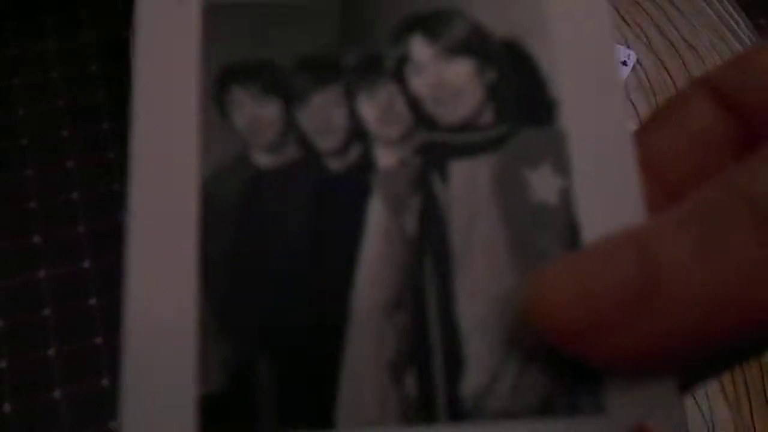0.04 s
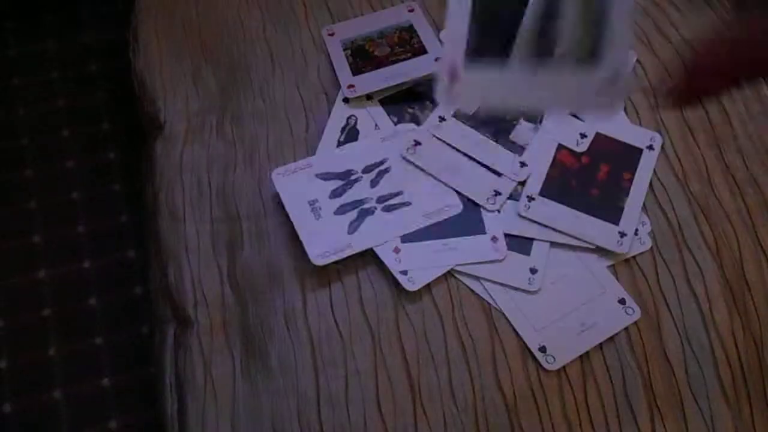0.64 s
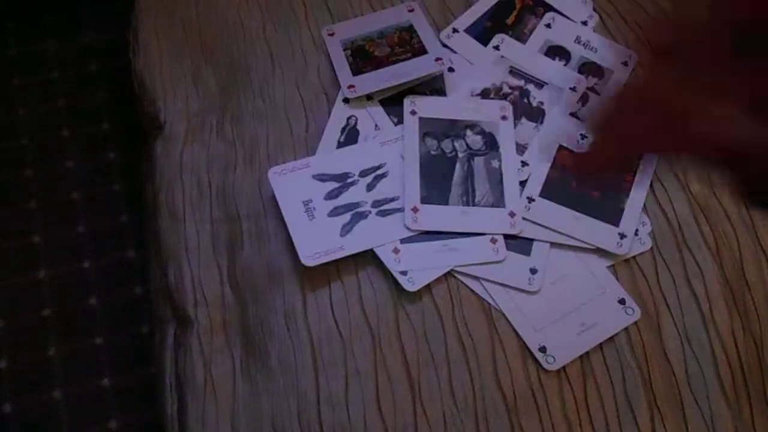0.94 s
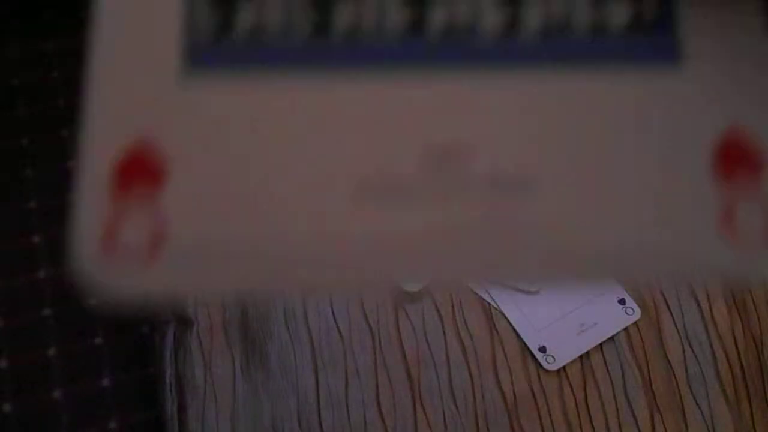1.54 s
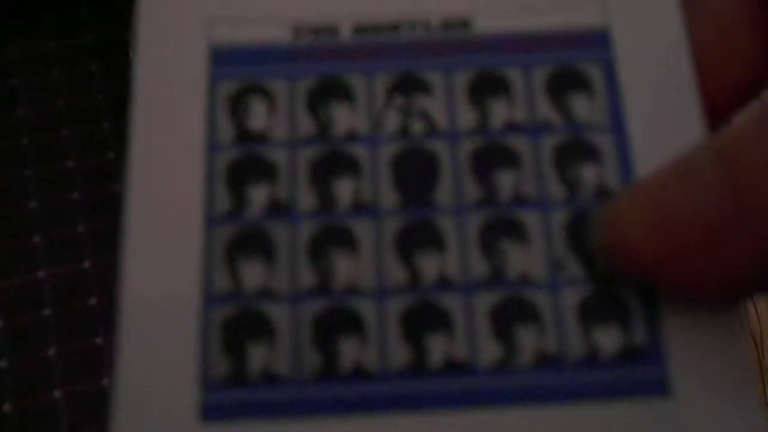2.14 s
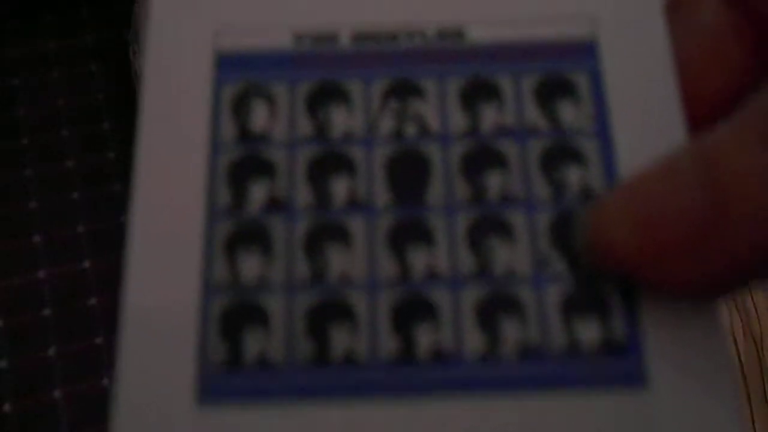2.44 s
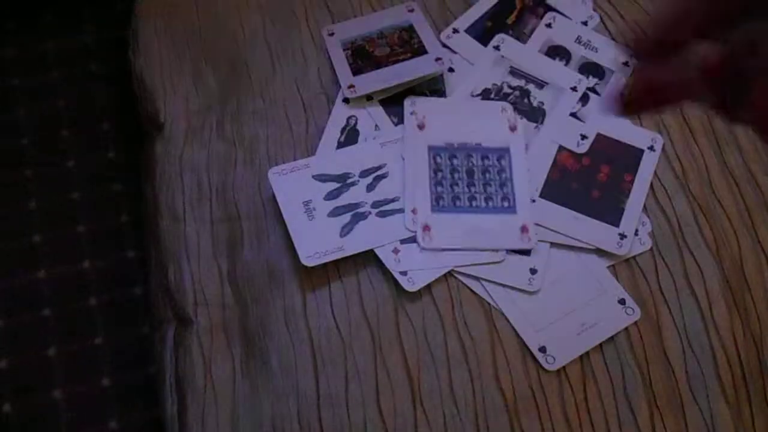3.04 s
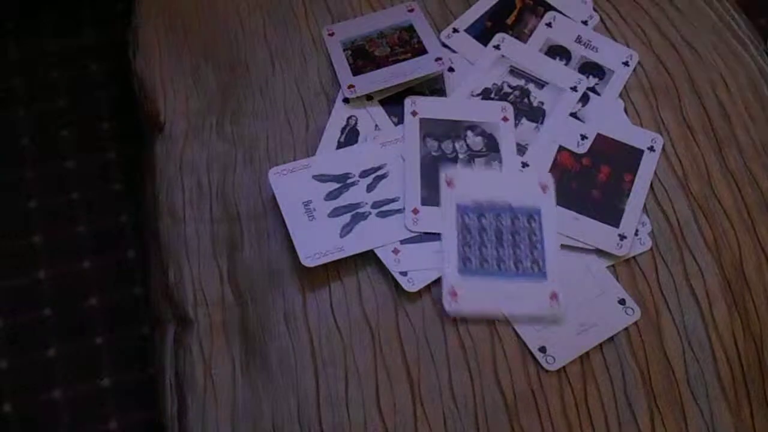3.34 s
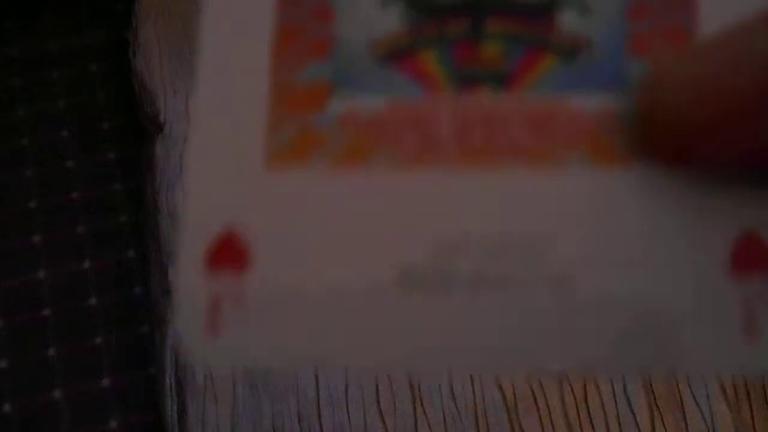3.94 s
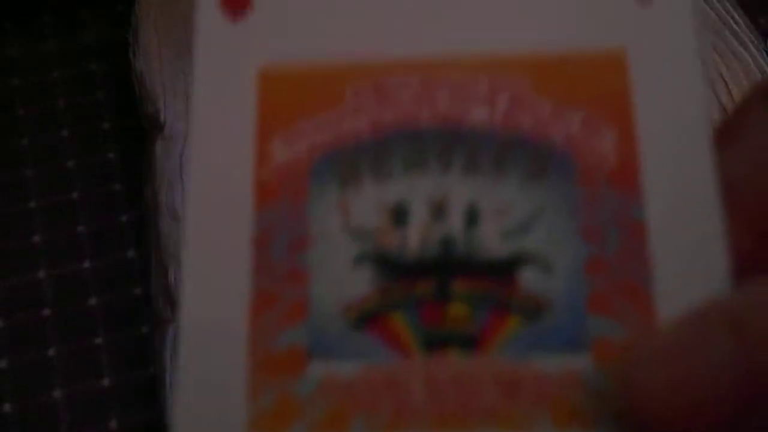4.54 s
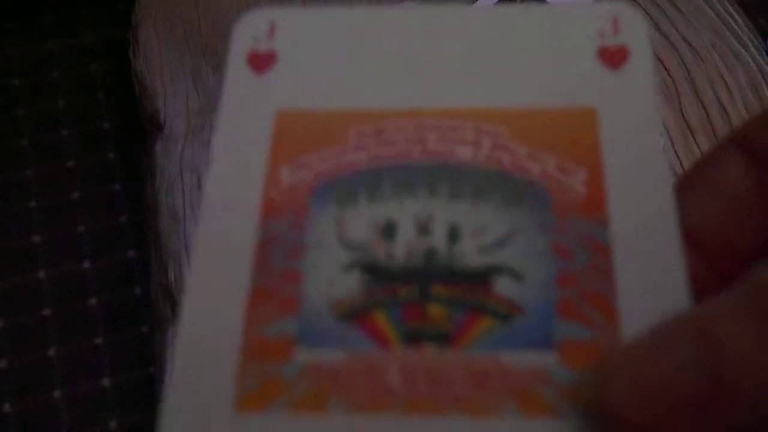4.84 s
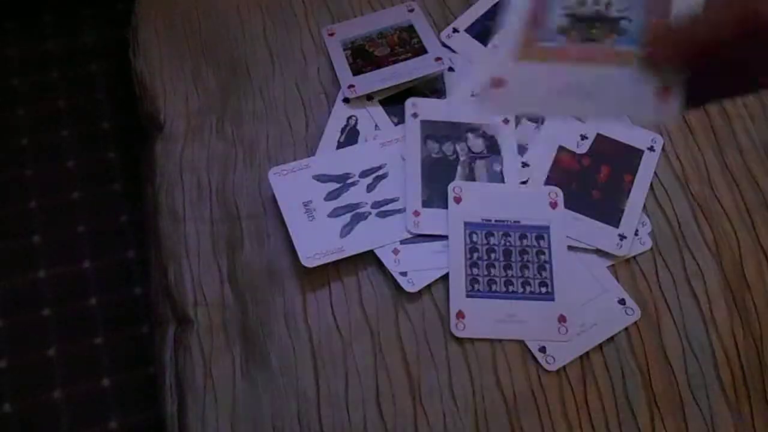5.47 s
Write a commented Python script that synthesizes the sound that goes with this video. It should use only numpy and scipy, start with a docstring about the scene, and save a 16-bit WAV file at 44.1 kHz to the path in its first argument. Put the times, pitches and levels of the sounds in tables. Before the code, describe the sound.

Playing cards are tossed onto a loose pile on a wooden table, heard close up in a small room with a very short echo. A quiet fan and a low electrical hum run throughout. After a barely audible swish, the first card lands at about 0.8 seconds in a quick clatter of crisp clicks. Soft, hissy strokes of card sliding over card follow, ending in a small tick and scrape near 1.4 seconds. After a lull and another faint swish, the second card hits at about 3 seconds with a louder, sharp slap and a few faint settling ticks. There is a brief scrape at 3.3 seconds, then light rubbing until about 3.9. Only the fan and hum remain until a faint swish at 5.4 seconds, and the third card ticks on its edge and slaps flat, loud and sharp, at about 5.7 seconds.

```python
"""Playing cards tossed one at a time onto a loose pile on a wooden table, close to the microphone.
Each card swishes through the air, ticks on its edge, flexes, slaps flat and settles; between tosses
the thumb slides the next one off the deck in a few strokes. The small room answers briefly,
and a fan and a mains hum run quietly in the background."""
import sys
import numpy as np
from scipy import signal
from scipy.fft import rfft, irfft
from scipy.io import wavfile
from scipy.ndimage import uniform_filter1d

SR = 44100
rng = np.random.default_rng(int(sys.argv[2]) if len(sys.argv) > 2 else 0)


def digitize_waveform(pressure):
    """Quantize a signal to 16-bit integers and store it at the path in sys.argv[1].

    Rows of a 2-D input are taken as channels; values are limited to [-1, 1].
    """
    field = np.atleast_2d(pressure).T
    bounded = np.clip(field, -1, 1)
    quanta = np.round(bounded * 32767).astype(np.int16)
    wavfile.write(sys.argv[1], SR, quanta)


N = 251728
TIME = np.arange(N) / SR

# broad colour of paper friction: (frequency [Hz], level [dB])
FRICTION_COLOUR = [(150, -30), (700, -9.5), (1800, -7), (2600, -0.5), (3600, 2), (5500, 3), (7500, 2.5),
                   (10000, 0), (12000, -8.5)]
# resonances of a moving card: (centre [Hz], width [Hz], lift [dB])
FRICTION_MODES = [(3800, 720, 0), (6240, 2100, 2)]


def undb(db):
    """Decibels to gain."""
    return 10 ** (np.asarray(db) / 20)


def unit(x):
    """Scale to rms 1."""
    return x / np.sqrt(np.mean(x ** 2))


def add(track, s, sound):
    """Mix a sound into the track at time s."""
    start = int(s * SR)
    part = sound[:max(len(track) - start, 0)]
    track[start:start + len(part)] += part


def fade(t, t60):
    """Exponential decay, 60 dB down after t60."""
    return np.exp(-np.log(1000) * t / t60)


def response(colour, modes=(), tilt_db=0, size=8192):
    """Impulse response of unit energy: a broad colour, lifted at its modes, tilted per octave above 1 kHz."""
    hz = np.maximum(np.arange(size // 2 + 1) * SR / size, 1)
    knots, levels = np.transpose(colour)
    db = np.interp(np.log(hz), np.log(knots), levels) + tilt_db * np.log2(np.maximum(hz, 1000))
    for centre, width, lift in modes:
        db = db + lift / (1 + (2 * (hz - centre) / width) ** 2)
    cepstrum = irfft(np.log(undb(db)))[:size // 2]  # one-sided, for minimum phase
    cepstrum[0] = 0
    impulse = irfft(np.exp(rfft(2 * cepstrum, size)))[:size // 2]
    return impulse / np.sqrt(np.sum(impulse ** 2))


def through(x, impulse):
    """Pass a sound through an impulse response."""
    return signal.fftconvolve(x, impulse)[:len(x)]


def walk(rate_hz):
    """Smooth random wander with a spread near 1."""
    steps = rng.standard_normal(int(N / SR * rate_hz) + 2)
    return np.interp(TIME * rate_hz, np.arange(len(steps)), steps)


def scatter(envelope, smooth_hz, crack=0):
    """Dense random echoes under an envelope, after an optional crack; even in colour, of unit energy."""
    size = len(envelope)
    echoes = rng.standard_normal(size) * envelope
    echoes[0] += crack
    spectrum = rfft(echoes, 2 * size)
    power = uniform_filter1d(np.abs(spectrum) ** 2, int(2 * size * smooth_hz / SR) + 1)
    echoes = irfft(spectrum / np.sqrt(power))[:size]
    return echoes / np.sqrt(np.sum(echoes ** 2))


def mains_hum(hz=99.8, level_db=-60.5):
    """A steady background tone at twice the mains frequency."""
    return np.sqrt(2) * np.sin(2 * np.pi * hz * TIME) * undb(level_db)


def fan(gain_db=1.5, waver_db=0.5, whine_hz=1803, wander_hz=6, whine_db=-77):
    """Wavering air noise coloured by the housing, and a faint whine that wanders with the fan's speed."""
    # broad colour of the moving air: (frequency [Hz], level [dB])
    air_colour = [(25, 6), (60, 12), (90, 0.5), (135, 4), (220, -2), (600, 1.5), (900, -1), (1600, -1),
                  (2100, -1), (3000, -0.5), (4400, -6), (7000, -4), (10000, -11), (12000, -17.5)]
    # resonances of the housing: (centre [Hz], width [Hz], lift [dB])
    housing_modes = [(334.8, 18, 7), (545.3, 23, 11), (1116, 41, 11.5), (1358, 30, 10.5), (1621, 240, 6),
                     (1819, 110, 9), (2686, 230, 7), (3280, 88, 8), (3900, 59, 8.5), (6650, 74, 5),
                     (6990, 110, 9), (9680, 180, 7)]
    # slow fall of the air noise: (time [s], level before gain_db [dB])
    air_levels = [(0.0, -55), (0.3, -57.5), (3.2, -58), (4.3, -59.5)]
    s, db = np.transpose(air_levels)
    air = unit(through(rng.standard_normal(N), response(air_colour, housing_modes)))
    air *= undb(np.interp(TIME, s, db) + gain_db + waver_db * walk(rate_hz=6))
    cycles = np.cumsum(whine_hz + wander_hz * walk(rate_hz=7.3)) / SR
    return air + undb(whine_db) * np.sqrt(2) * np.sin(2 * np.pi * cycles)


def room(x, build_s=0.0027, early_t60_s=0.061, early_db=-20, late_t60_s=0.17, late_db=-14.5):
    """Table and hand throw back quick echoes; the walls of the small room add a soft diffuse tail."""
    # warm colour of the echoes: (frequency [Hz], level [dB])
    echo_colour = [(200, 6.3), (2000, 4.5), (5000, 1.8), (10000, -0.5)]
    t = np.arange(SR // 2) / SR
    build = 1 - np.exp(-t / build_s)
    early = undb(early_db) * scatter(build * fade(t, early_t60_s), smooth_hz=227)
    late = undb(late_db) * scatter(build * fade(t, late_t60_s), smooth_hz=60)
    return through(x, through(early + late, response(echo_colour)))


def paper_grains(grain_db=3, catch_db=1.9, catch_hz=220):
    """Paper fibres catch and slip in tiny grains of noise."""
    noise = rng.standard_normal(N)
    roughness_db = grain_db * rng.standard_normal(N) + catch_db * walk(catch_hz)
    return unit(noise * undb(roughness_db))


def stroke(peak_s, rise_s, fall_s, speed_exponent=1.36):
    """Loudness of one hand movement, 0 to 1: it grows with speed, from rest to fastest and back."""
    ramp = np.interp(TIME, [peak_s - rise_s, peak_s, peak_s + fall_s], [0, 1, 0])
    speed = np.sin(np.pi / 2 * ramp)
    return speed ** speed_exponent


def swishes(grains, half_swing_s=0.1, tilt_db=-3.6):
    """A card swung through the air before it is let go gives a dull swish."""
    # swings of the hand: (fastest moment [s], level [dB])
    swings = [(0.56, -60), (2.65, -58), (5.395, -56)]
    swish = through(grains, response(FRICTION_COLOUR, FRICTION_MODES, tilt_db))
    return swish * sum(undb(db) * stroke(s, half_swing_s, half_swing_s) for s, db in swings)


def slides(grains, ring_width_hz=1800, ring_lift_db=4.5):
    """A card slid over other cards hisses, and sings at a pitch set by where it is held."""
    # strokes of card over card:
    # (fastest moment [s], level [dB], speeding up [s], slowing down [s], tilt [dB/octave], ring [Hz])
    strokes = [ (0.93, -54.5, 0.02, 0.19, -3.5, 5000), (1.055, -48.5, 0.035, 0.057, 0.5, 6500),
               (1.211, -50, 0.14, 0.024, 0, 5200), (1.362, -47, 0.085, 0.04, -0.5, 4750),
               (1.39, -38.5, 0.02, 0.012, 0, 3770), (3.297, -38.5, 0.018, 0.055, 1, 6500),
               (3.47, -57.5, 0.15, 0.11, -0.5, 5500), (3.585, -52, 0.058, 0.056, -2, 4900),
               (3.64, -55, 0.047, 0.085, 2.5, 9300), (3.676, -46.5, 0.019, 0.013, -3.5, 5560),
               (3.85, -64, 0.18, 0.098, 1, 9300)]
    out = np.zeros(N)
    for s, db, rise_s, fall_s, tilt_db, ring_hz in strokes:
        ring = (ring_hz, ring_width_hz, ring_lift_db)
        hiss = through(grains, response(FRICTION_COLOUR, FRICTION_MODES + [ring], tilt_db))
        out += undb(db) * stroke(s, rise_s, fall_s) * hiss
    return out


def puffs(rise_s=0.0001, size=256):
    """A card landing flat squeezes out one pulse of air, which gives the slap its low end."""
    # flat landings: (time [s], peak [dB])
    flat_landings = [(0.837, -43), (2.9841, -21), (5.6971, -14.5)]
    out = np.zeros(N)
    age = np.arange(size) / SR / rise_s
    for s, db in flat_landings:
        add(out, s, -undb(db) * age * np.exp(1 - age))
    return out


def flexes(hz=1303, rise_s=0.0025, steepness=3, size=1024):
    """A card landing on its edge bends and sings for a few cycles, dying as the pile damps it."""
    # edge landings: (time [s], peak [dB])
    edge_landings = [(0.8053, -19.5), (2.9558, -34), (5.6716, -32)]
    out, t = np.zeros(N), np.arange(size) / SR
    age = t / rise_s
    bend = (age * np.exp(1 - age)) ** steepness * np.sin(2 * np.pi * hz * t)
    for s, db in edge_landings:
        add(out, s, undb(db) * bend)
    return out


def contacts(gain_db=2.0, ring_width_hz=770, ring_lift_db=2.5, smother_per_db=0.23, size=4096):
    """A crack, then a dying chatter of card on card; returns the sound at the microphone and all round."""
    # hits on the pile: (time [s], level before gain_db [dB], t60 [ms], tilt [dB/octave], ring [Hz])
    hits = [ (0.804, -21.5, 15, -1, 3750), (0.8108, -18.5, 13.4, -0.5, 6900), (0.8353, -15.5, 32, 0, 3120),
            (0.84, -20.5, 12, 2.5, 5050), (0.8634, -24, 19, -1, 3780), (0.893, -37.5, 48, 0.5, 2670),
            (0.9048, -26.5, 16, -1.5, 5140), (1.361, -35, 33, -1.5, 3900), (2.748, -48.5, 14, -5, 4670),
            (2.9542, -26, 31, -0.5, 3470), (2.9717, -34.5, 40, -3, 9100), (2.9841, -8, 11, 1.5, 8250),
            (2.9870, -16, 10, 1.5, 6700), (2.9924, -16.5, 10, 3, 4950), (3.015, -32.5, 13, -2.5, 4300),
            (3.0428, -41, 9.2, -1, 8500), (3.1422, -44, 21, 2.5, 5000), (3.1800, -52, 25, 12, 6400),
            (3.4484, -47, 15, -8, 2160), (5.6324, -46.5, 26, -2, 6200), (5.6418, -49, 21, -11, 3700),
            (5.6474, -46.5, 21, -9, 5000), (5.6705, -18.5, 10.5, 1.5, 7260),
            (5.6850, -29.5, 19, -3.5, 5300), (5.6968, -7.5, 16.4, 1, 6900)]
    # broad colour of a hit: (frequency [Hz], level [dB])
    card_colour = [(60, -39), (220, -9), (700, -7), (1400, -5.5), (2600, 0), (5000, -0.5), (7000, 3.5),
                   (10000, -3), (12000, -9)]
    # resonances of card and pile: (centre [Hz], width [Hz], lift [dB])
    card_modes = [(2720, 310, 4.5), (3200, 75, 1), (3820, 280, 1), (5010, 270, 6), (6050, 190, 0.5),
                  (6530, 120, 5.5), (7820, 200, -0.5), (8200, 290, 0.5), (10000, 160, 7.5)]
    direct, around, t = np.zeros(N), np.zeros(N), np.arange(size) / SR
    for s, db, t60_ms, tilt_db, ring_hz in hits:
        decay = fade(t, t60_ms / 1000)
        chatter = scatter(decay, smooth_hz=960, crack=2.44)
        force = undb(db + gain_db) * np.sqrt(np.sum(decay ** 2)) * chatter
        # where the card is hit and held sets the pitch; a hard slap smothers the ring
        ring = (ring_hz, ring_width_hz, ring_lift_db - smother_per_db * db)
        add(direct, s, through(force, response(card_colour, card_modes + [ring], tilt_db)))
        # each resonance beams its own way; over all directions only the broad colour is left
        add(around, s, through(force, response(card_colour, tilt_db=tilt_db)))
    return direct, around


def scene(flex_send_db=-8):
    """One microphone close to the pile, with room echo, fan and hum behind the cards."""
    snaps, around = contacts()
    grains = paper_grains()
    rubbing = slides(grains) + swishes(grains)
    bends = flexes()
    # the two faces of a bending card cancel far away, so little of it echoes
    echo = room(around + rubbing + undb(flex_send_db) * bends)
    return (snaps + rubbing + bends + puffs() + echo + fan() + mains_hum())[None]


def record(dry, ceiling=0.88, shelf_db=-13, top_hz=12100):
    """The recorder rounds the loudest peaks, dulls the highest treble and cuts the top."""
    rounded = ceiling * np.tanh(dry / ceiling)
    edges_hz = [0, 10300, 11100, SR / 2]
    shelf = signal.firwin2(129, edges_hz, [1, 1, undb(shelf_db), undb(shelf_db)], fs=SR)
    dulled = signal.fftconvolve(rounded, shelf[None], mode="same")
    lowpass = signal.ellip(8, .2, 80, top_hz, fs=SR, output="sos")
    return signal.sosfilt(lowpass, dulled)


dry = scene()
out = record(dry)
digitize_waveform(out)
```